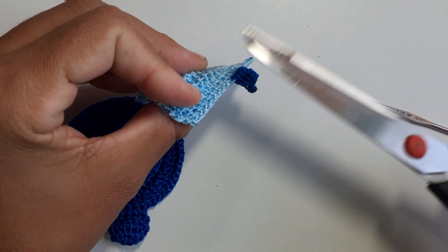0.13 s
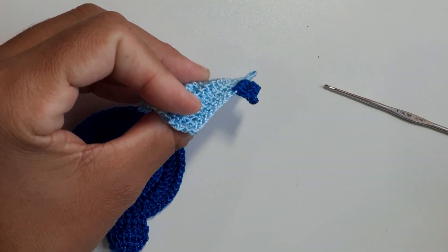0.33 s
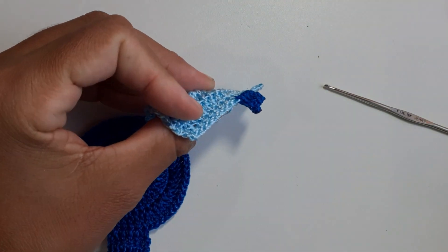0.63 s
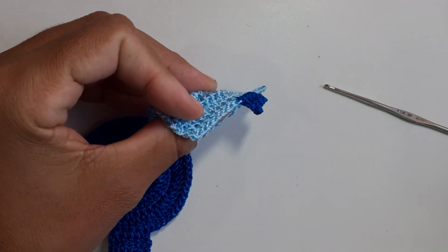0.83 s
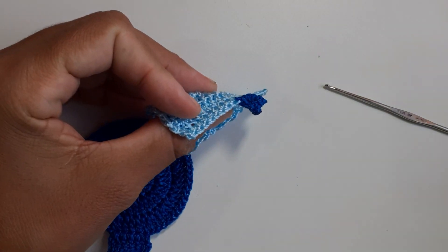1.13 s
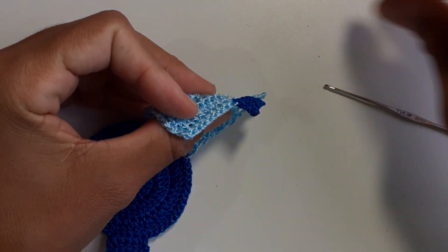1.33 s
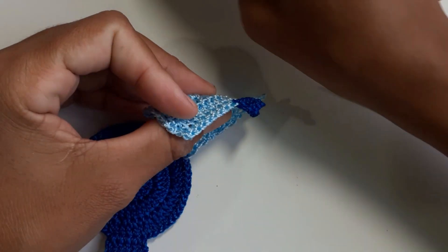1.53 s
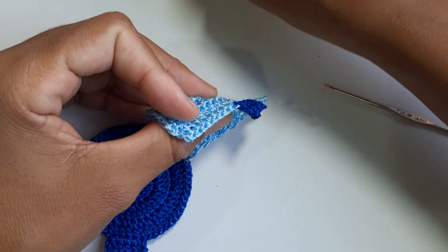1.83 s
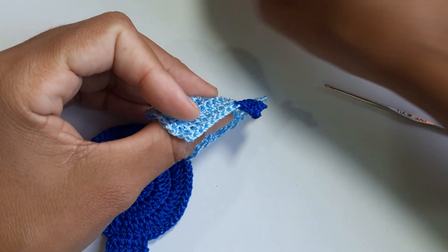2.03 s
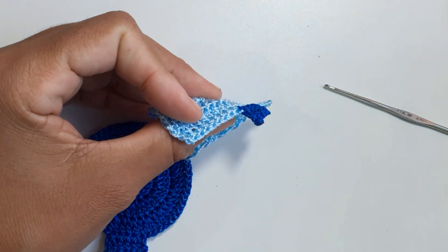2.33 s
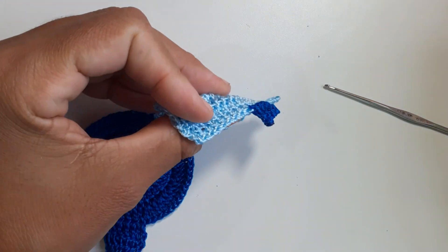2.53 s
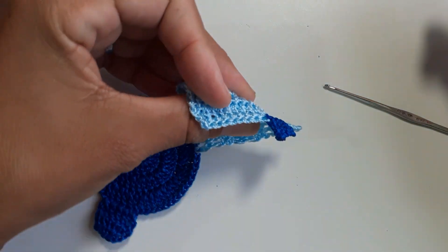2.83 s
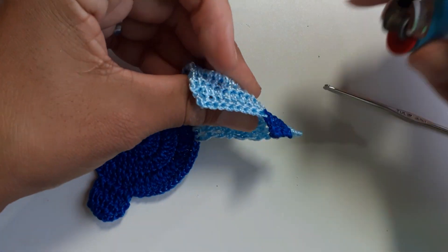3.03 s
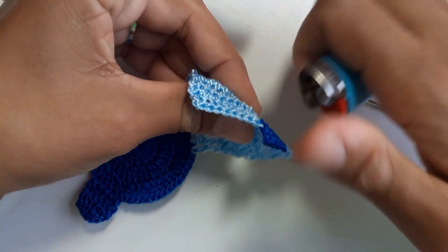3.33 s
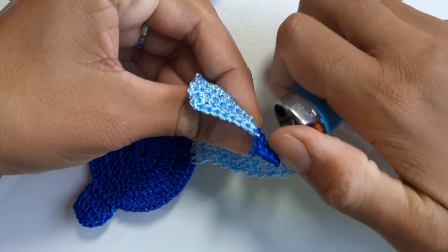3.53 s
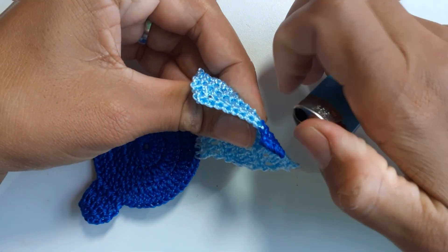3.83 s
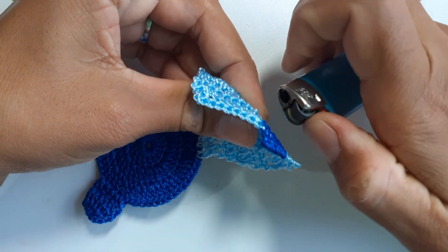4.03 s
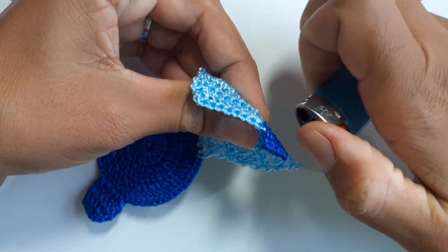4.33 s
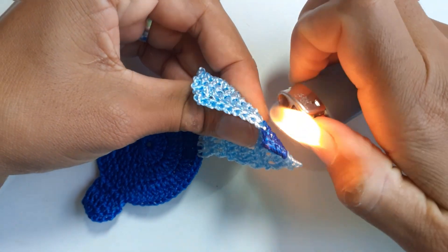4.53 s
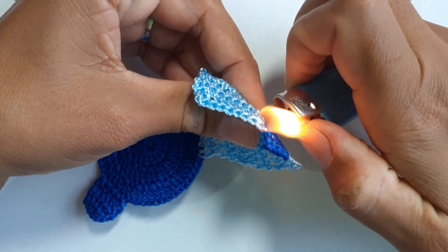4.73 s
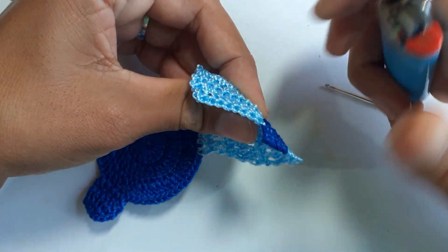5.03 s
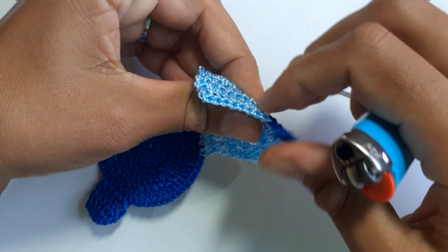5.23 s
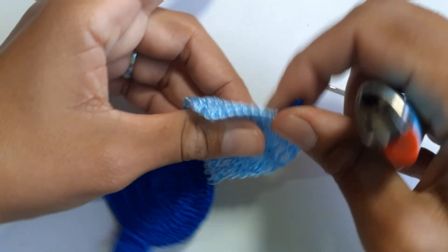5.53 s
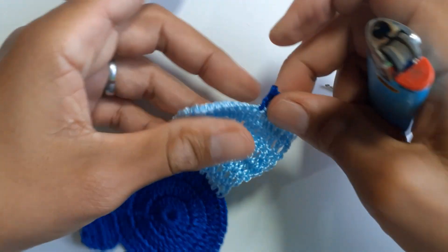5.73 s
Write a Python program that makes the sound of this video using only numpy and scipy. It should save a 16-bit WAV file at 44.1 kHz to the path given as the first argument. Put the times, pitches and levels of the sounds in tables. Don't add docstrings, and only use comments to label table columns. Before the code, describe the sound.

A close stereo microphone in a small, quiet, slightly reverberant room. At 0 s the bright tail of a scissor snip dies away within a fraction of a second, leaving faint low rumble, a wavering motor hum and thin hiss. Around 0.67 s scissors lightly tick the desk, with a knock at 0.92 s. From 1.08 to 1.25 s they drop loudly: dense steel clicks, plastic handle knocks, wooden thumps and loose rattling, settling by about 1.35 s with a fingertip tick. Quiet follows, with tiny ticks near 2.25 s and a hollow plastic knock at 2.6 s as a lighter is lifted. Soft brushing passes around 2.9 and 3.4 s. The flint wheel rasps briefly and snaps sharply at 4.03 s, and again at 4.49 s, with a crisp tick between at 4.23 s. A barely audible gas whistle lasts from 4.6 to 4.9 s. A finger tick at 4.97 s precedes faint, steady yarn rubbing from 5.15 s on.

```python
import sys
import numpy as np
from scipy import signal
from scipy.fft import rfft, irfft, next_fast_len
from scipy.io import wavfile
from scipy.ndimage import map_coordinates

SR = 44100
rng = np.random.default_rng(int(sys.argv[2]) if len(sys.argv) > 2 else 0)


def to_wav(sig):
    pcm = np.clip(np.atleast_2d(sig), -1, 1) * 32767
    pcm = np.round(pcm).astype(np.int16)
    wavfile.write(sys.argv[1], SR, pcm.T)


def to_linear_factor(level_db):
    exponent = np.asarray(level_db, float) / 20
    return 10 ** exponent


N = 260190
TIME = np.arange(N) / SR
PADDED = next_fast_len(N + 400)


def rms_one(x):
    return x / np.sqrt(np.mean(x ** 2) + 1e-20)


def level(rows, column=1):
    rows = np.array(rows)
    return to_linear_factor(np.interp(TIME, rows[:, 0], rows[:, column], -200, -200))


def at_hz(points, hz):
    table_hz, values = np.array(points)[:, 0], np.array(points)[:, 1]
    return np.interp(np.log(np.maximum(hz, 1)), np.log(table_hz), values)


def drift(rate_hz):
    knots = rng.standard_normal(400)
    return map_coordinates(knots, [TIME * rate_hz], order=3, mode="wrap")


def band_pass(x, order, low_hz, high_hz):
    return signal.sosfilt(signal.butter(order, [low_hz, high_hz], "band", fs=SR, output="sos"), x)


# (frequency [Hz], level [dB])
EVEN = ((1, 0), (2, 0))


def ports(x, side, lag_s=0., spectrum=EVEN):
    hz = np.fft.rfftfreq(PADDED, 1 / SR)
    half = to_linear_factor(at_hz(side, hz) / 2)
    left_delay = np.exp(-2j * np.pi * hz * lag_s)
    gain = to_linear_factor(at_hz(spectrum, hz)) * np.array([half * left_delay, 1 / half])
    return irfft(rfft(x, PADDED) * gain, PADDED)[:, :N]


# (frequency [Hz], correlation [-1 to 1])
LIKENESS = [(60, 0.78), (130, 0.95), (290, 1), (640, 0.67), (1410, 0.27), (3100, -0.055), (6820, 0.27),
            (15000, -0.71)]
# (frequency [Hz], left minus right [dB])
ROOM_SIDE = [(60, -11), (150, -9.5), (380, -9.5), (950, -9.5), (2380, -4), (5980, -7.5), (15000, 1)]


def air(spectrum):
    hz = np.fft.rfftfreq(PADDED, 1 / SR)
    alike = np.clip(at_hz(LIKENESS, hz), 0, 1)
    half = to_linear_factor(at_hz(ROOM_SIDE, hz) / 2)
    mid, side = rng.standard_normal((2, len(hz))) + 1j * rng.standard_normal((2, len(hz)))
    pair = np.sqrt(1 + alike) * mid + np.sqrt(1 - alike) * side * [[1], [-1]]
    pair = irfft(pair * to_linear_factor(at_hz(spectrum, hz)) * [half, 1 / half], PADDED)[:, :N]
    return pair / np.std(pair.mean(axis=0))


def blows(rows, column=1):
    clicks = np.zeros(N)
    clicks[[round(row[0] * SR) for row in rows]] = to_linear_factor(np.array(rows)[:, column])
    return clicks


def crack(clicks, t60):
    burst = signal.lfilter([1], [1, -to_linear_factor(-60 / (t60 * SR))], np.abs(clicks))
    return burst * (burst > 1e-5) * rng.standard_normal(N)


def ring(clicks, modes, spread_db, facing_db):
    hits, out = np.flatnonzero(clicks), np.zeros((2, N))
    first, last = hits[0], min(N, hits[-1] + SR // 2)
    luck = rng.standard_normal((len(hits), len(modes)))
    facing = rng.standard_normal((len(modes), 2, 1))
    for k, (hz, level_db, t60) in enumerate(modes):
        r, w = to_linear_factor(-60 / (t60 * SR)), 2 * np.pi * hz / SR
        drive = clicks[first:last] + 1e-18
        drive[hits - first] *= to_linear_factor(level_db + spread_db * luck[:, k]) * (-1) ** k
        tone = signal.lfilter([0, np.sin(w)], [1, -2 * r * np.cos(w), r * r], drive)
        out[:, first:last] += tone * to_linear_factor(facing_db * facing[k])
    return out


# (frequency [Hz], t60 [s])
ROOM_T60 = [(100, .22), (500, .25), (2000, .29), (6000, .33), (15000, .2)]


def room(x):
    t = TIME[:SR // 2]
    tail = 0
    for hz in 70 * 2. ** np.arange(8):
        octave = band_pass(rng.standard_normal((2, len(t))), 2, hz, 2 * hz)
        t60 = at_hz(ROOM_T60, 1.4 * hz)
        tail = tail + octave * to_linear_factor(-60 * t / t60) / np.sqrt(t60)
    tail = tail * np.clip(t / 0.01 - .4, 0, 1)
    tail = tail / np.sqrt(np.sum(tail ** 2) / 2)
    return signal.fftconvolve(x.mean(axis=0)[None], tail, axes=1)[:, :N]


# (time [s], opening [dB])
OPENINGS = [
    (.66, 6.5),
    (.92, 1),
    (1.09, 3),
    (3.401, 2.5),
    (3.75, 5),
    (4.02, 3),
    (4.549, 3.5),
    (5.5, 3),
]
OPEN_S, RUMBLE_CLOSE_S, HISS_CLOSE_S = 0.028, 3.63, 0.74


def opening(close_s):
    since = np.maximum(TIME - np.array(OPENINGS)[:, :1], 0)
    return np.array(OPENINGS)[:, 1] @ ((1 - np.exp(-since / OPEN_S)) * np.exp(-since / close_s))


# (frequency [Hz], density [dB per Hz])
RUMBLE = [(15, -60.5), (25, -35.5), (34, -23), (48, -11.5), (65, -10.5), (85, -10), (108, -6.5), (266, -3),
          (338, 0), (655, -21), (884, -18), (1370, -26.5), (1610, -22.5), (3000, -46.5), (3900, -67.5),
          (6600, -120)]
# (frequency [Hz], density [dB per Hz])
HISS = [(1180, -20.5), (2000, -2.5), (2200, -6), (2540, -4), (3190, -7), (6470, -4), (7720, -1.5),
        (8890, 1), (10100, -5.5), (15200, -8), (16100, -6.5), (16500, -29.5)]
RUMBLE_DB, HISS_DB = -74, -81.5
HISS_FOLLOWS = 0.67
HUM_HZ, HUM_DB, HUM_WAVER_DB = 59.3, -70, 3
HUM_FADED_S, HUM_BEAT_S = 2.3, 3.3
RUB_FROM_S, RUB_FULL_S, RUB_DB = 5.13, 5.2, -76.5


def background():
    rumble = air(RUMBLE) * to_linear_factor(RUMBLE_DB + opening(RUMBLE_CLOSE_S) + 1.2 * drift(9.0))
    motor = np.sin(2 * np.pi * HUM_HZ * TIME + .8 * drift(12.0))
    beat = np.cos(np.pi * (TIME - HUM_FADED_S) / HUM_BEAT_S - np.pi / 2)
    hum = motor * beat * to_linear_factor(HUM_DB + HUM_WAVER_DB * drift(3.5))
    hum = hum * to_linear_factor(np.array([[-3.0], [3.0]]))
    rub = to_linear_factor(RUB_DB) * np.clip((TIME - RUB_FROM_S) / (RUB_FULL_S - RUB_FROM_S), 0, 1)
    hiss = np.hypot(to_linear_factor(HISS_DB + HISS_FOLLOWS * opening(HISS_CLOSE_S)), rub)
    return rumble + hum + air(HISS) * hiss


# (frequency [Hz], density [dB per Hz])
SNIP = [(710, -30), (1200, -29), (1410, -24), (2120, -14.5), (3590, -17), (5510, -13.5), (6360, -7.5),
        (7830, -14), (8930, -4.5), (10100, -13.5), (15100, -19.5), (16000, -33), (16500, -33)]
SNIP_DB, SNIP_T60_S = -52.5, 0.31
BLADE_DB, BLADE_T60_S = -58, 0.037


def snip():
    answer = to_linear_factor(SNIP_DB - 60 * TIME / SNIP_T60_S)
    last_ring = to_linear_factor(BLADE_DB - 60 * TIME / BLADE_T60_S)
    return air(SNIP) * (answer + last_ring)


# (time [s], steel tick [dB], handle [dB], desk thud [dB], contact hardness [Hz])
KNOCKS = [(0.669, -66.5, -61, -70, 6000), (0.6732, -53, -56.5, -55, 9200),
          (0.6874, -48, -53.5, -60.5, 9100), (0.696, -55, -52.5, -55.5, 4000), (0.826, -85, -70, -75, 2500),
          (0.8332, -78.5, -62.5, -66, 2500), (0.845, -80, -64, -72, 2500), (0.8544, -73, -59.5, -71, 2478),
          (0.9184, -47, -60, -52, 4997), (1.0817, -63, -50.5, -44.5, 8000),
          (1.0837, -47.5, -37, -30.5, 8000), (1.0995, -23, -36.5, -38.5, 9000),
          (1.1023, -29, -41, -41.5, 4750), (1.1149, -54, -35, -27.5, 2526),
          (1.1245, -55.5, -48.5, -31, 1980), (1.134, -41.5, -42.5, -27.5, 2000),
          (1.152, -31.5, -51, -33.5, 4855), (1.195, -29, -52, -36.5, 7384), (1.212, -41, -49, -34, 2000),
          (1.2275, -36, -57, -45, 3400), (1.2507, -41, -60, -43.5, 4540)]
# (frequency [Hz], level [dB])
STEEL = [(2400, -1.5), (3000, 3.5), (3700, -1), (4600, -7), (5600, -9.5), (6500, -4.5), (7400, -5.5),
         (8500, -9), (10000, -16), (11800, -14), (14000, -16.5)]
STEEL_T60_S = .005


def blades():
    modes = [(hz, level_db, STEEL_T60_S) for hz, level_db in STEEL]
    steel = ring(crack(blows(KNOCKS), 0.0087), modes, spread_db=1.0, facing_db=0.3)
    starts = [round(row[0] * SR) for row in KNOCKS] + [N]
    out = np.zeros((2, N))
    for start, end, row in zip(starts, starts[1:], KNOCKS):
        soft = signal.butter(2, min(row[4], .45 * SR), fs=SR, output="sos")
        out[:, start:end] = signal.sosfilt(soft, steel[:, start:end])
    return out * to_linear_factor(-6.5)


# (frequency [Hz], level [dB], t60 [s])
HANDLE = [(1040, -2, 0.045), (1480, -1, 0.0511), (1531, 0, 0.11), (1627, 1, 0.082), (1772, 5, 0.0309),
          (2120, -5, 0.023), (2600, -9, 0.0196)]
# (frequency [Hz], level [dB], t60 [s])
DESK = [(143, -5.5, 0.12), (267.2, -6.5, 0.069), (339, -3.5, .085), (398, -8.5, 0.072),
        (435.5, -7.5, 0.094), (550, 1, 0.029), (585.3, -4.5, 0.1), (655.5, -6.5, 0.14), (745, -9, 0.078),
        (880, -9.5, 0.063), (986, -8, 0.03), (1027, -8, 0.037), (1220, -9.5, 0.021), (1330, -11.5, 0.06),
        (2054, -7, 0.044), (2494, -8.5, .03)]


def scissors():
    handle_cracks = crack(blows(KNOCKS, column=2), 0.025)
    handles = ring(handle_cracks, HANDLE, spread_db=3.0, facing_db=1.5)
    thumps = blows(KNOCKS, column=3)
    thumps = thumps + to_linear_factor(-24.5) * crack(thumps, .06)
    return handles * to_linear_factor(-21) + ring(thumps, DESK, spread_db=3.0, facing_db=1.0) * to_linear_factor(-5.5)


# (frequency [Hz], density [dB per Hz])
RATTLE = [(120, -12), (280, -2), (500, -2.5), (900, -1), (1500, -2), (3000, -9), (6000, -22),
          (10000, -40.5)]
RATTLE_DB, RATTLE_T60_S = -1.5, 0.13


def rattle():
    unevenness = to_linear_factor(2.6 * np.minimum(rng.exponential(1, N), 4) - 5.5)
    debris = crack(blows(KNOCKS, column=3), RATTLE_T60_S) * unevenness
    return ports(debris, EVEN, spectrum=RATTLE) * to_linear_factor(RATTLE_DB)


# (time [s], level [dB], low edge [Hz], high edge [Hz], t60 [s])
TICKS = [(1.341, -53, 4400, 11600, .2), (1.342, -51, 1495, 4000, .24), (1.343, -54, 449, 1505, 0.22),
         (2.245, -65.5, 5000, 13000, .03), (2.279, -69, 4460, 12930, .13), (2.6, -51.5, 5700, 8080, .1),
         (2.602, -65, 8130, 14700, .098), (3.094, -69.5, 2500, 9900, .12), (3.74, -64.5, 6440, 9930, .013),
         (3.953, -65.5, 3000, 15500, .071), (3.972, -62, 3000, 3700, .07), (3.99, -60, 3000, 3700, .05),
         (4.2341, -46, 2600, 16300, 0.038), (4.96, -66, 4550, 5700, .02), (4.9723, -48, 2600, 15500, .03),
         (4.97, -56.5, 2600, 3270, .06)]
# (time [s], level [dB], low edge [Hz], high edge
# [Hz])
BRUSHES = [(0.691, -58, 110, 191.6), (1.32, -66, 4000, 11970), (1.891, -73.5, 6000, 15300),
           (2.875, -68, 6140, 15540), (3.301, -75, 1015, 1800), (3.359, -79.5, 1300, 1702),
           (3.381, -65.5, 250, 354), (3.822, -68.5, 2010, 9000), (3.825, -61, 201, 1500),
           (3.89, -65, 147, 1295), (2.869, -81, 1200, 3500)]
BRUSH_T60_S, BRUSH_RISE_S = 0.27, .017
TICK_RISE_SHARE, TICK_RISE_MAX_S = .035, 0.0041
PUFF_GRAIN_DB = 5.0


def fingers():
    out, t = np.zeros((2, N)), TIME[:SR // 3]
    puffs = [(*row, min(TICK_RISE_SHARE * row[-1], TICK_RISE_MAX_S)) for row in TICKS]
    puffs += [(*row, BRUSH_T60_S, BRUSH_RISE_S) for row in BRUSHES]
    for s, level_db, low_hz, high_hz, t60, rise in puffs:
        unevenness = to_linear_factor(PUFF_GRAIN_DB * np.minimum(rng.exponential(1, len(t)), 5))
        grains = rng.standard_normal((2, len(t))) * unevenness
        noise = band_pass(grains, 3, low_hz, high_hz)
        shape = np.minimum(t / rise, 1) * to_linear_factor(level_db - 60 * np.maximum(t - rise, 0) / t60)
        start = round(s * SR)
        out[:, start:start + len(t)] += rms_one(noise) * shape
    return out


# (time [s], level [dB])
LIFT = [
    (.918, -55.5),
    (2.592, -71.5),
    (2.603, -68),
    (2.611, -57.5),
    (2.619, -56),
    (2.653, -67),
    (2.688, -72),
]
# (frequency [Hz], level [dB], t60 [s])
SHELL = [(334.7, 0.5, 0.099), (430.3, -2.5, 0.033), (578, -6, 0.041), (710, -4.5, 0.027), (961, -7, 0.0598),
         (1084.5, -4.5, 0.096), (1223, -3, 0.016), (1467, -7, 0.037), (2067.5, -11.5, 0.042),
         (2600, -17.5, 0.018), (3195, -12.5, 0.016), (4000, -13.5, 0.011)]


def lift():
    return ring(crack(blows(LIFT), 0.03) * to_linear_factor(-9.0), SHELL, spread_db=3.0, facing_db=-3.0)


GRIND_DB_PER_S, SURGE_S, BITE_DB_PER_S, STOP_DB_PER_S = 401, 0.0089, 2203, 1400
CREEP_DB, CREEP_DB_PER_S = -20, 899


def roll(bite_s, slip_s, bite_db, slip_db):
    creep_s, surge_s = bite_s + CREEP_DB / BITE_DB_PER_S, slip_s - SURGE_S
    creep_db = bite_db + CREEP_DB
    surge_db = bite_db + GRIND_DB_PER_S * (surge_s - bite_s)
    return level([(creep_s - 30 / CREEP_DB_PER_S, creep_db - 29),
                  (creep_s, creep_db),
                  (bite_s, bite_db),
                  (surge_s, surge_db),
                  (slip_s, slip_db),
                  (slip_s + 40 / STOP_DB_PER_S, slip_db - 34.5)])


# (teeth bite [s], wheel slips [s], grit at bite [dB], grit at slip [dB])
STRIKES = [
    (4.012, 4.037, -45.5, -25),
    (4.476, 4.496, -40, -25),
]
# (time [s], level [dB])
SNAPS = [
    [(4.0352, -14), (4.0374, -32), (4.0428, -34)],
    [(4.4935, -26), (4.4966, -23)],
]
# (frequency [Hz], density [dB per Hz])
HOODS = [
    [(500, -35), (1000, -17.5), (1600, -17.5), (2400, -11), (3400, -10.5), (4000, -12.5), (5640, 1),
     (6800, -2), (9500, -12), (10800, -12.5), (13000, -8), (14600, -7), (16200, -13)],
    [(500, -42), (1000, -15.5), (1600, -14), (2400, -19), (3200, -8.5), (3850, -17.5), (5000, -6.5),
     (6800, -5), (8100, -8), (10000, -6.5), (12200, -9.5), (14800, -6), (16200, -11)],
]
# (time [s], level [dB])
LANDINGS = [
    (4.0352, -35.5),
    (4.496, -38),
]
# (frequency [Hz], level [dB], t60 [s])
THUMB = [(110, -2.5, 0.038), (330, 4.5, 0.03), (570, -2, 0.025), (770, 1, 0.022), (1200, -11.5, 0.011)]


def lighter():
    unevenness = to_linear_factor(4.6 * np.minimum(rng.exponential(1, N), 4))
    grit = rms_one(rng.standard_normal(N) * unevenness)
    own = rng.standard_normal((2, N))
    out = ring(blows(LANDINGS), THUMB, spread_db=1.5, facing_db=-1.5)
    for strike, snaps, hood in zip(STRIKES, SNAPS, HOODS):
        grind = (grit + 1.3 * own) * roll(*strike) * to_linear_factor(8.0)
        snap = crack(blows(snaps), 0.0078) * to_linear_factor(14.0)
        out = out + ports(grind + snap, EVEN, spectrum=hood)
    return out


GAS_HZ, GAS_WIDTH_HZ, GAS_DB = 1850, 70, -81
FLAME_ON_S, FLAME_OFF_S, FLAME_FADE_S = 4.64, 4.86, .1


def gas():
    edges = [(GAS_HZ - 4 * GAS_WIDTH_HZ, -40), (GAS_HZ, 0), (GAS_HZ + 4 * GAS_WIDTH_HZ, -40)]
    inside_s = np.minimum(TIME - FLAME_ON_S, FLAME_OFF_S - TIME)
    burning = np.clip(1 + inside_s / FLAME_FADE_S, 0, 1)
    return air([(20, -78)] + edges + [(20000, -84)]) * burning * to_linear_factor(GAS_DB)


# (frequency [Hz], left minus right [dB])
DESK_SIDE = [(60, 0.5), (340, -6), (1000, -4.5), (1550, -2.5), (2700, -9.5), (4500, -3), (6200, -8),
             (15000, 4)]
# (frequency [Hz], left minus right [dB])
HAND_SIDE = [(60, -5), (340, -9), (1100, -2), (2200, 0.5), (3100, -6.5), (4500, 1.5), (6200, -5),
             (15000, 5.5)]
DESK_WET_DB, HAND_WET_DB = -8, -12
STEEL_WET_DB = -4.5
DESK_LAG_S, HAND_LAG_S = .00019, .00024


def scene():
    steel = blades()
    desk = scissors() + rattle() + lift()
    hand = lighter() + fingers()
    desk_room = to_linear_factor(DESK_WET_DB) * room(desk + to_linear_factor(STEEL_WET_DB) * steel)
    hand_room = to_linear_factor(HAND_WET_DB) * room(hand)
    desk = ports(steel + desk + desk_room, DESK_SIDE, -DESK_LAG_S)
    hand = ports(hand + hand_room, HAND_SIDE, -HAND_LAG_S)
    return desk + hand + background() + snip() + gas()


def low_pass(x):
    return signal.sosfilt(signal.butter(12, 16800, fs=SR, output="sos"), x)


def record(dry):
    top_cut = signal.cheby2(14, 50, 16600, fs=SR, output="sos")
    return low_pass(signal.sosfilt(top_cut, dry))


dry = scene()
out = record(dry)
to_wav(out)
```